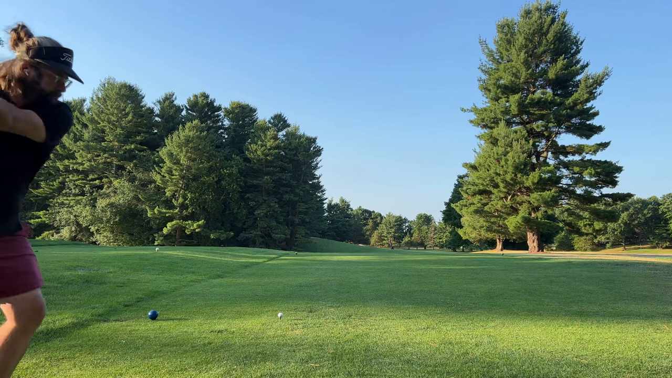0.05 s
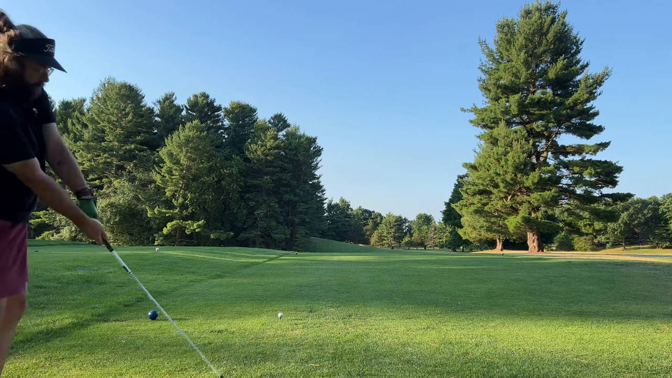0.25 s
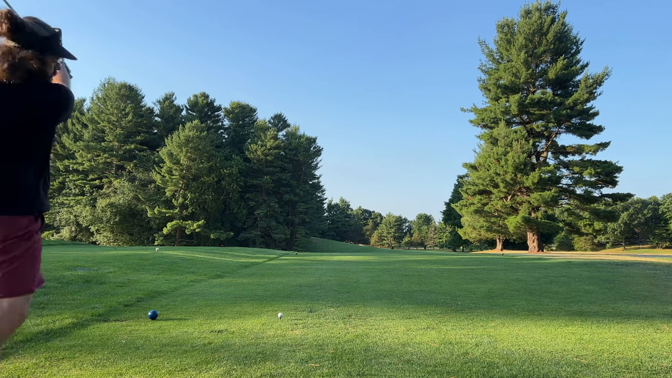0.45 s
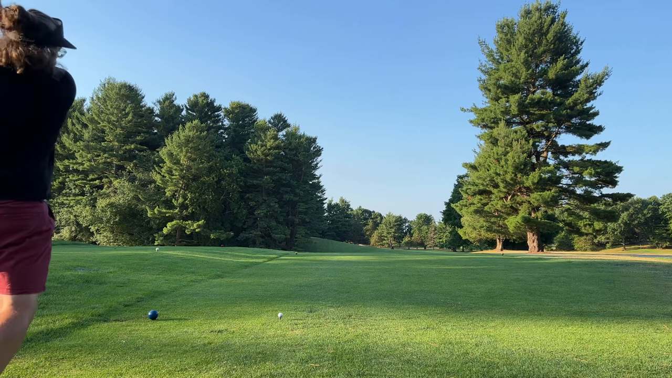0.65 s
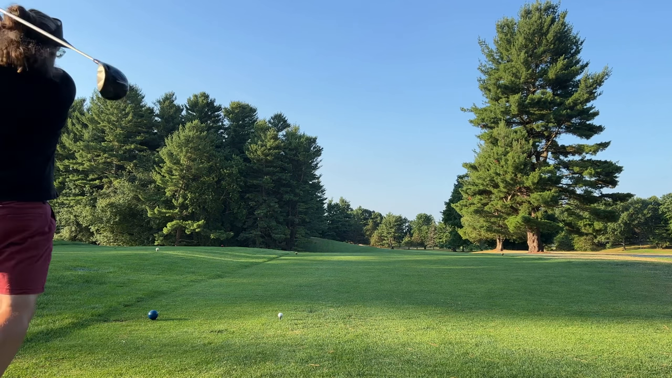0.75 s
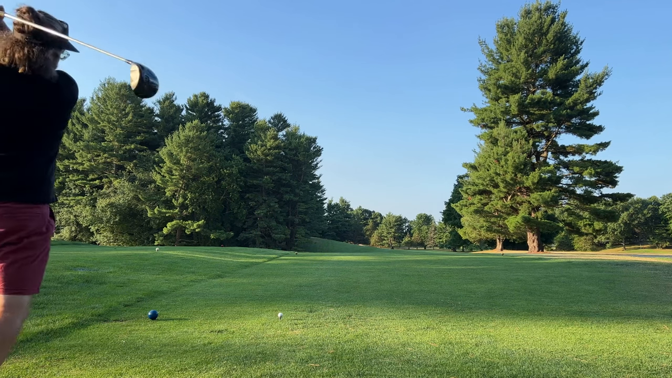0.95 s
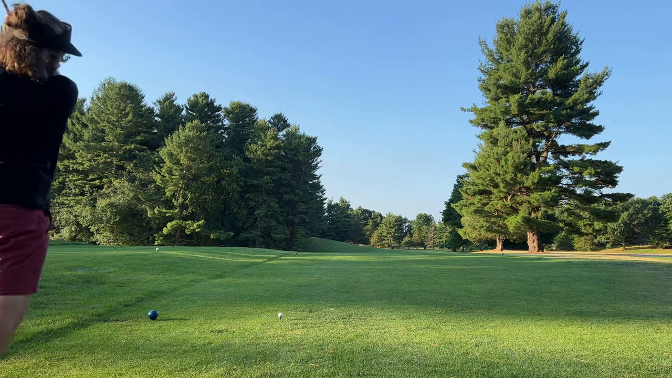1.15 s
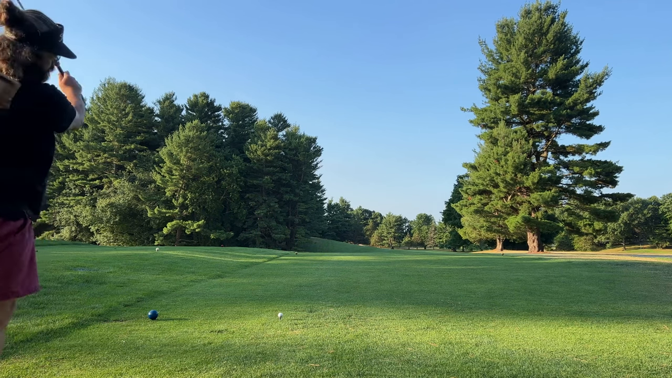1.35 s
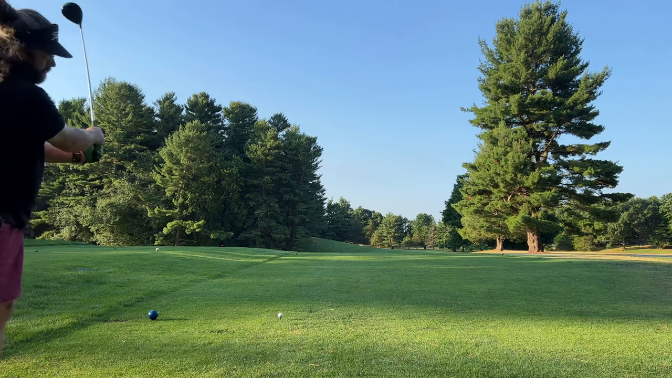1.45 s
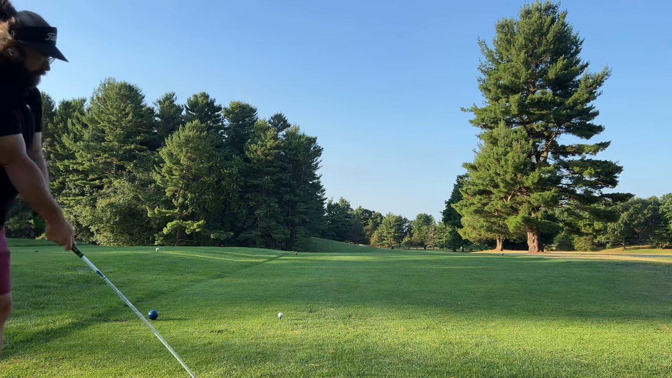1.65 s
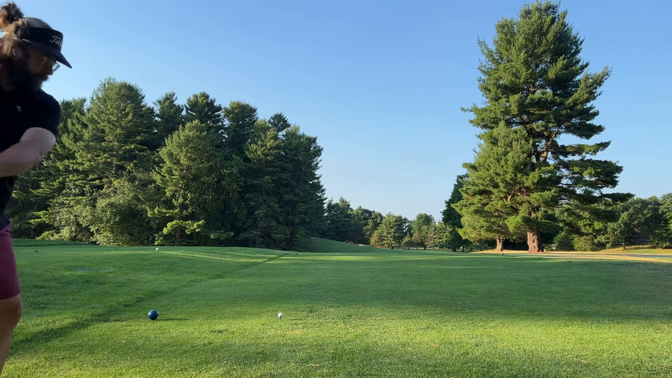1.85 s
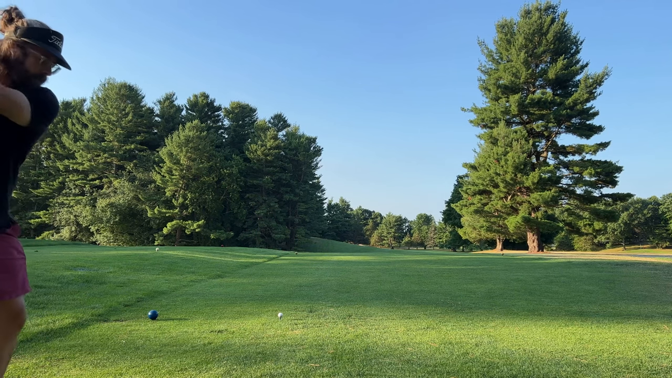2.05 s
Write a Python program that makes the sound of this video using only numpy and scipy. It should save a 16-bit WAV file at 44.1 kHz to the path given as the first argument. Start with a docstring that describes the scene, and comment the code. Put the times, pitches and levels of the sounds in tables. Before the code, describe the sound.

A golf club swishes once, close and slightly left: a wavering whistle rises from 0.2 seconds, rips past at 0.3 with a bright hiss and short low whoomp, and is gone by about 0.45, leaving a faint scattered swish. Thin high birds whistle at the start, with sparse falling chirps until 1.4. Wind thumps the microphone mostly from 1.1 to 1.5; soft high rustle swells near 1.6 over quiet outdoor hush.

```python
"""Small birds whistle from the trees as a breeze rumbles on the microphone over a quiet outdoor hush.
A golf club makes one practice swing close by: vortices whistle off the shaft, their pitch tied to its speed.
The head rips past with a flare of hiss and a low whoomp in its wake; turf and trees return a faint swish.
Then more bird calls, single eddies that thump on the microphone, and a soft swell of high rustle.
Whistles and thumps are wavering sines; hiss, rumble, hush and rustle are shaped noise."""
import sys
import numpy as np
from scipy import signal
from scipy.fft import rfft, irfft
from scipy.io import wavfile

SR = 44100
rng = np.random.default_rng(int(sys.argv[2]) if len(sys.argv) > 2 else 0)


def digitize_waveform(pressure):
    """Quantize a signal to 16-bit integers and store it at the path in sys.argv[1].

    Rows of a 2-D input are taken as channels; values are limited to [-1, 1].
    """
    field = np.atleast_2d(pressure).T
    bounded = np.clip(field, -1, 1)
    quanta = np.round(bounded * 32767).astype(np.int16)
    wavfile.write(sys.argv[1], SR, quanta)


N = 92610
T = np.arange(N) / SR
HZ = np.arange(N // 2 + 1) * SR / N
SIDES = np.array([[1], [-1]])  # left, right

PASS_S = .3018  # head closest to the microphone
VORTEX_WIDTH = 0.0601  # relative waver of pitch
# thin hiss of the shaft and of its scatter: (frequency [Hz], spectrum level [dB])
HISS_SPECTRUM = [(300, 0), (1200, 1.5), (2200, -0.5), (4300, 0.5), (6300, -0.5), (7700, 2), (9500, -6.5),
                 (15500, -15)]


def undb(db):
    """Decibels to gain."""
    return 10 ** (np.asarray(db) / 20)


def unit(x):
    """Scale to rms 1."""
    return x / np.sqrt(np.mean(x ** 2))


def curve(table, column=1):
    """One column of a table joined by straight lines in time."""
    rows = np.array(table)
    return np.interp(T, rows[:, 0], rows[:, column])


def over_hz(points):
    """(Hz, value) points joined on a log-frequency axis."""
    rows = np.array(points)
    return np.interp(np.log(HZ + 1), np.log(rows[:, 0]), rows[:, 1])


def noise(points):
    """Noise of rms 1 with the given spectrum."""
    return unit(irfft(rfft(rng.standard_normal(N)) * undb(over_hz(points)), N))


def wander(hz):
    """Slow random signal of rms 1, up to about the given rate."""
    lowpass = np.exp(-.5 * (HZ / hz) ** 2)
    return unit(irfft(rfft(rng.standard_normal(N)) * lowpass, N))


def place(x, pan_db, lag_s):
    """Two microphone ports: the left is louder and hears it first, by one cycle at most."""
    spectrum = rfft(x)
    turn_rad = np.pi * np.minimum(HZ * lag_s, 1)
    left = irfft(spectrum * undb(pan_db / 2) * np.exp(1j * turn_rad), N)
    right = irfft(spectrum * undb(-pan_db / 2) * np.exp(-1j * turn_rad), N)
    return np.array([left, right])


def around(points):
    """Noise from all around: a left-leaning mid plus an independent side of opposite sign in each port."""
    # gain of the side noise: (frequency [Hz], gain [dB])
    side_gain = [(200, -3.5), (550, 5.5), (2300, 1), (4000, -5), (6300, 2.5), (8300, -5.5), (10500, -16)]
    side = irfft(rfft(noise(points)) * undb(over_hz(side_gain)), N)
    pan_db = 5.5 * np.clip(1 - HZ / 14000, 0, 1)
    return place(noise(points), pan_db, 0) + side * SIDES


def blown(x, pan_db=1.1, lag_rad=0.71):
    """Wind pressure drifts across the two ports: stronger on the left, earlier on the right."""
    return irfft(rfft(x) * undb(SIDES * pan_db / 2) * np.exp(-.5j * SIDES * lag_rad), N)


def vortices(hz, width, flutter_hz=60, rough=0.33, overtone_db=-16.5):
    """Air leaves a moving rod in uneven eddies: a wavering tone with weak second and third harmonics."""
    phase = 2 * np.pi * np.cumsum(hz * (1 + width * wander(flutter_hz))) / SR
    overtones = np.sin(2 * phase) + .5 * np.sin(3 * phase)
    tone = np.sin(phase) + undb(overtone_db) * overtones
    return unit((1 + rough * wander(flutter_hz)) * tone)


def birds(waver=0.005, edge_power=0.36):
    """Thin gliding whistles, the highest ones buzzy; the trees scatter them back a moment later."""
    # (start [s], length [s], first pitch [Hz], last pitch [Hz],
    #  bend [power; 1 straight, more holds the first pitch], level before distance loss [dB])
    notes = [(-.01, 0.062, 8130, 7640, 0.74, -55), (.02, 0.051, 6150, 7740, 0.88, -60),
             (0.043, 0.1, 7800, 7650, 0.83, -61), (.125, 0.069, 2596, 2480, 1.07, -58.5),
             (0.146, 0.039, 7700, 7870, 2.1, -57.5), (0.192, 0.028, 6420, 7550, 0.93, -55.5),
             (0.326, 0.072, 3020, 2760, 4.7, -58.5), (0.659, 0.036, 4594, 4470, 0.88, -64.5),
             (.705, 0.1, 3853, 3720, 1, -66), (.953, 0.033, 4590, 3300, 0.91, -57),
             (.97, 0.021, 3250, 2610, 0.9, -59.5), (1.093, .079, 4276, 3700, 8, -51.5),
             (1.24, 0.051, 4300, 3004, 1.3, -56), (1.367, 0.035, 4125, 2935, 1.23, -53.5)]
    buzz_above_hz, buzz_waver = 5500, .014
    octave_db, octave_glide_hz_per_s = -10.5, 15000  # fast falling chirps carry an octave
    near_db = -58  # fainter notes come from deeper in the trees, mostly as echo
    echo_db, echo_rise_s, echo_fall_s = -4.5, 0.017, 0.049
    direct, sung = np.zeros(N), np.zeros(N)
    for start_s, length_s, first_hz, last_hz, bend, db in notes:
        u = np.clip((T - start_s) / length_s, 0, 1)
        depth = buzz_waver if first_hz > buzz_above_hz else waver
        glide_hz = first_hz + (last_hz - first_hz) * u ** bend
        phase = 2 * np.pi * np.cumsum(glide_hz * (1 + depth * wander(164))) / SR
        tone = np.sin(phase)
        if (first_hz - last_hz) / length_s > octave_glide_hz_per_s:
            tone += undb(octave_db) * 2 * u * np.sin(2 * phase)
        envelope = (4 * u * (1 - u)) ** edge_power * (1 + 0.26 * wander(110))
        note = undb(db) * np.sqrt(2) * envelope * tone
        sung += note
        direct += note * undb(min(db - near_db, 0))
    echo_envelope = (1 - np.exp(-T / echo_rise_s)) * np.exp(-T / echo_fall_s)
    trees = unit(rng.standard_normal((2, N)) * echo_envelope) / np.sqrt(N)
    echo = signal.fftconvolve(sung[None], trees, axes=1)[:, :N]
    return place(direct, 7.5, 0.00033) + undb(echo_db) * echo


def breeze(side_db=-14):
    """Gusts buffet the two ports, mostly together and a little apart."""
    # gusts: (time [s], level [dB])
    gusts = [(0, -40.5), (.06, -50.5), (.14, -38.5), (.21, -49.5), (.33, -38.5), (.45, -40), (.62, -41.5),
             (.83, -44.5), (1.07, -42.5), (1.16, -31.5), (1.22, -36), (1.32, -32.5), (1.46, -37.5),
             (1.55, -39.5), (1.62, -47.5), (1.69, -39.5), (1.78, -44.5), (2.1, -47)]
    # rumble: (frequency [Hz], spectrum level [dB])
    rumble = [(20, -24.5), (35, -18), (50, -4), (70, 1.5), (120, -1.5), (170, -9), (260, -20), (400, -43),
              (900, -81), (4000, -97)]
    both = blown(noise(rumble)) + undb(side_db) * noise(rumble) * SIDES
    return both * undb(curve(gusts))


def course():
    """The far hush of the open course, with one soft swell of high rustle: noise from all around."""
    # both: (frequency [Hz], spectrum level [dB])
    hush = [(120, -7.5), (200, -0.5), (280, -6.5), (350, -9), (800, -12.5), (1220, -14), (2500, -26),
            (3500, -25.5), (5200, -31), (7600, -28), (9300, -48), (12000, -41.5), (15000, -61)]
    rustle = [(1800, -12), (4000, 1.5), (5500, -3.5), (7000, -11), (8000, 1.5), (9500, -14), (15000, -29)]
    hush_db, rustle_db = -51, -59
    rustle_s, rustle_sigma_s = 1.59, 0.22
    swell = undb(rustle_db) * np.exp(-.5 * ((T - rustle_s) / rustle_sigma_s) ** 2)
    return undb(hush_db) * around(hush) + swell * around(rustle)


def shaft():
    """Sections whistle in gusts, pitched by speed, raggedly after the pass; hiss grows steeply with speed."""
    # (time [s], vortex pitch at the tip [Hz], whistle level [dB])
    swing = [(.15, 290.4, -64), (.19, 360.2, -45.5), (.22, 500.3, -37.5), (.229, 566.3, -36.5),
             (.2355, 589.3, -24.5), (.245, 585, -27.5), (.259, 648, -32), (.269, 729.7, -25),
             (.292, 650.2, -27.5), (.311, 540.5, -34), (.328, 560, -30.5), (.355, 449, -40),
             (.385, 362.9, -54), (.44, 277.8, -59)]
    # (share of the tip's speed [ratio], level [dB])
    sections = [(1.0, -1), (.9, -3.5), (.76, -8), (.6, -11), (.45, -14)]
    gust_db, gust_hz = 1, 70
    stirred_width = 0.0985  # extra waver in the air that the head has stirred
    hiss_db, hiss_at_hz, hiss_power = -44.5, 711, 3.25  # level at this tip pitch; power of speed
    tip_hz = curve(swing)
    width = VORTEX_WIDTH + stirred_width * (T > PASS_S)
    whistle = np.zeros(N)
    for share, db in sections:
        gain = undb(db + gust_db * wander(gust_hz))
        whistle += gain * vortices(tip_hz * share, width)
    moving = (T > swing[0][0]) & (T < swing[-1][0])
    hiss = undb(hiss_db) * (tip_hz / hiss_at_hz) ** hiss_power * moving * around(HISS_SPECTRUM)
    return undb(curve(swing, 2)) * place(whistle, 0.84, 0.00032) + hiss


def head(rough=0.04, eddy_hz=450):
    """The head's hiss flares as it passes closest; the stirred air dies away behind it."""
    # air torn by the club: (frequency [Hz], spectrum level [dB])
    rush = [(150, 11), (500, 10), (1050, 8), (1500, 1), (2050, -5.5), (2600, -2.5), (3900, -8), (5500, 0.5),
            (6800, -5.5), (7750, 7), (8300, 1), (11500, -4.5), (15500, -11)]
    pass_half_s, distance_power = 0.0043, 2.39  # miss distance over speed; fall with distance
    near_db, tail_db, tail_s = -18.5, -34.5, 0.022
    since_s = T - PASS_S
    near = 1 / (1 + np.abs(since_s / pass_half_s) ** distance_power)
    tail = (since_s > 0) * np.exp(-np.abs(since_s) / tail_s)
    level = undb(near_db) * near + undb(tail_db) * tail
    return noise(rush) * (1 + rough * wander(eddy_hz)) * level


def wake():
    """Big eddies behind the head: a short whoomp that drops in pitch."""
    peak_s, half_s, level_db = .304, 0.0084, -20.5
    peak_hz, end_hz, fall_s = 255.1, 104.93, 0.00627
    since_s = T - peak_s
    hz = end_hz + (peak_hz - end_hz) * (1 - np.tanh(since_s / fall_s))
    return undb(level_db) * vortices(hz, VORTEX_WIDTH, rough=0.36) / (1 + (since_s / half_s) ** 2)


def scatter(level_db=-54, rise_s=0.047, fall_s=0.26, dull_hz=9500):
    """The swish comes back faintly from the turf and trees, with less treble: noise that swells and fades."""
    since_s = np.maximum(T - PASS_S, 0)
    dulled = [(hz, db - 10 * np.log10(1 + (hz / dull_hz) ** 4)) for hz, db in HISS_SPECTRUM]
    envelope = (1 - np.exp(-since_s / rise_s)) * np.exp(-since_s / fall_s)
    return undb(level_db) * envelope * around(dulled)


def buffets(waver=0.1303):
    """Single eddies press briefly on the ports: soft, low thumps, each a wavering sine in a bell envelope."""
    # (centre [s], pitch [Hz], bell sigma [s], level [dB])
    eddies = [(0.342, 160, 0.01, -34), (0.929, 90.3, 0.0041, -28.5), (1.014, 65, 0.012, -31),
              (1.094, 75.3, 0.0074, -28), (1.134, 125.9, 0.0034, -23.5), (1.165, 150.2, 0.0048, -20.5),
              (1.158, 55, 0.013, -29), (1.201, 71.7, 0.0038, -19), (1.259, 75, 0.018, -22.5),
              (1.343, 62.06, 0.015, -22), (1.447, 78.6, 0.011, -22), (1.493, 84, 0.0092, -29),
              (1.705, 95.1, 0.0064, -38)]
    out = np.zeros(N)
    for at_s, hz, sigma_s, db in eddies:
        cycles = np.cumsum(hz * (1 + waver * wander(53.7))) / SR + rng.random()
        bell = np.exp(-.5 * ((T - at_s) / sigma_s) ** 2)
        out += undb(db) * bell * np.sqrt(2) * np.sin(2 * np.pi * cycles)
    return blown(out)


def scene(head_side_db=-14):
    """The swing just left of the microphone, with the course around it."""
    # balance of head and wake: (frequency [Hz], left minus right [dB])
    head_pan = [(750, 1.5), (1400, 3), (2400, 0), (4200, 14), (6400, 0.5), (7250, 9.5), (8500, 0.5)]
    spread = undb(head_side_db) * head() * SIDES
    passing = place(head() + wake(), over_hz(head_pan), 0.00012)
    club = shaft() + passing + spread
    return birds() + breeze() + course() + club + scatter() + buffets()


def record(dry, low_cut_hz=24, top_hz=15650):
    """The recorder cuts the deepest rumble and the top."""
    thin = irfft(rfft(dry) * (1 - 1 / (1 + (HZ / low_cut_hz) ** 4)), N)
    return signal.sosfilt(signal.ellip(10, .1, 80, top_hz, fs=SR, output="sos"), thin)


dry = scene()
out = record(dry)
digitize_waveform(out)
```